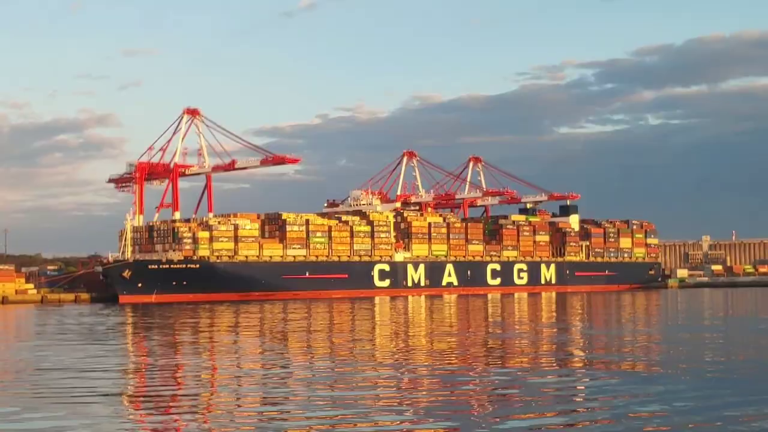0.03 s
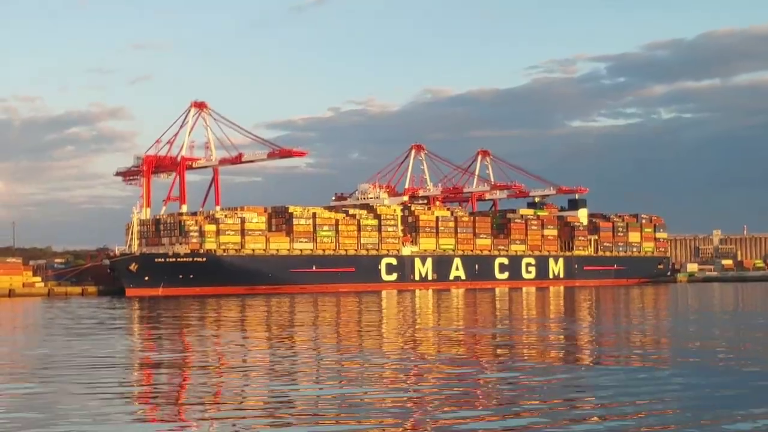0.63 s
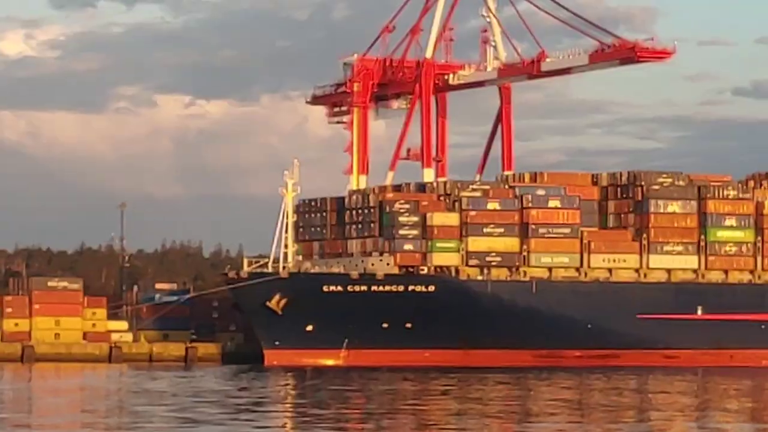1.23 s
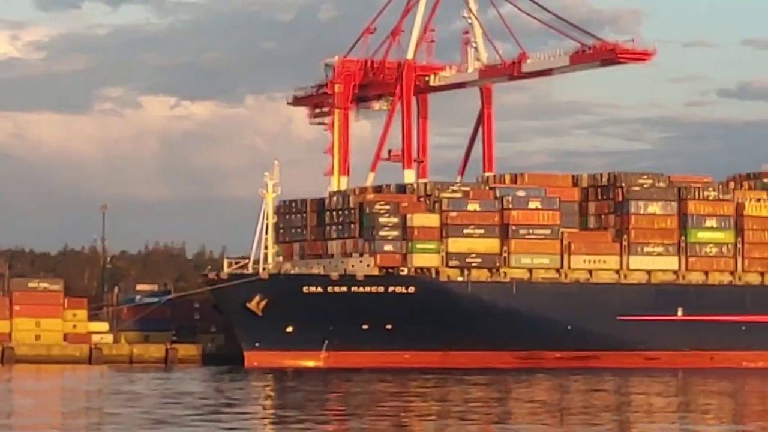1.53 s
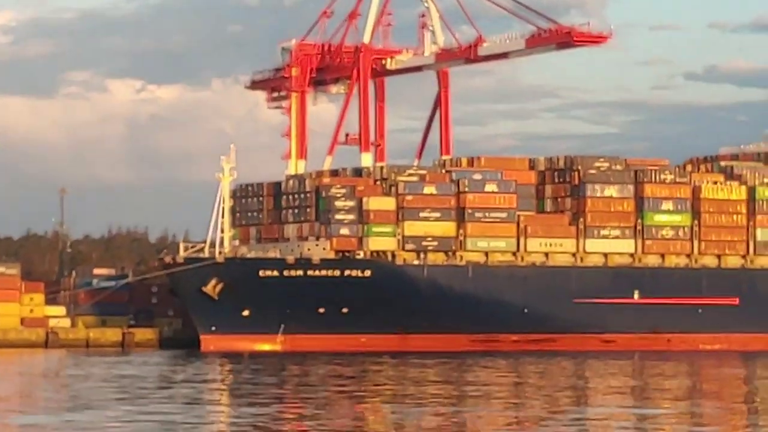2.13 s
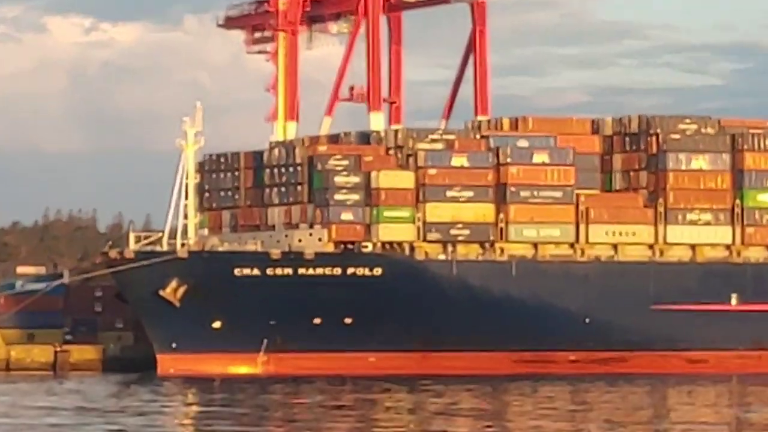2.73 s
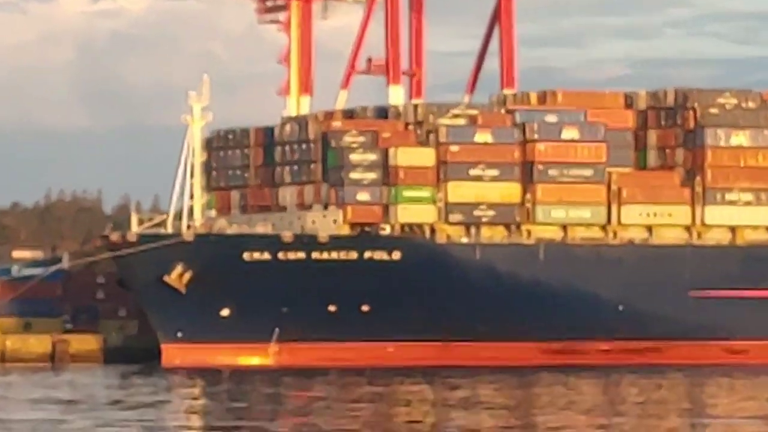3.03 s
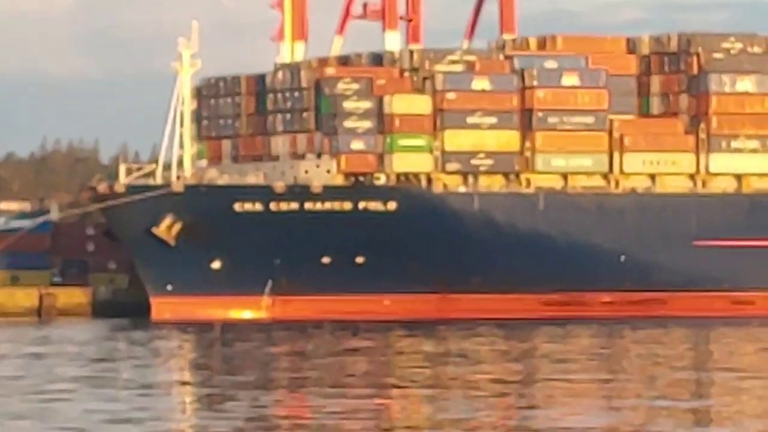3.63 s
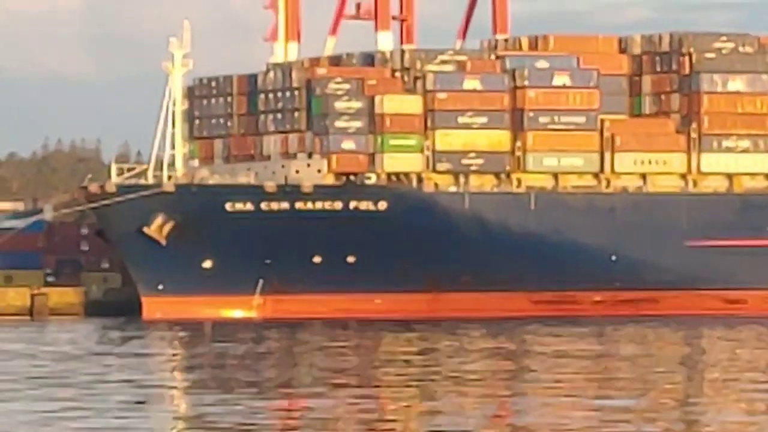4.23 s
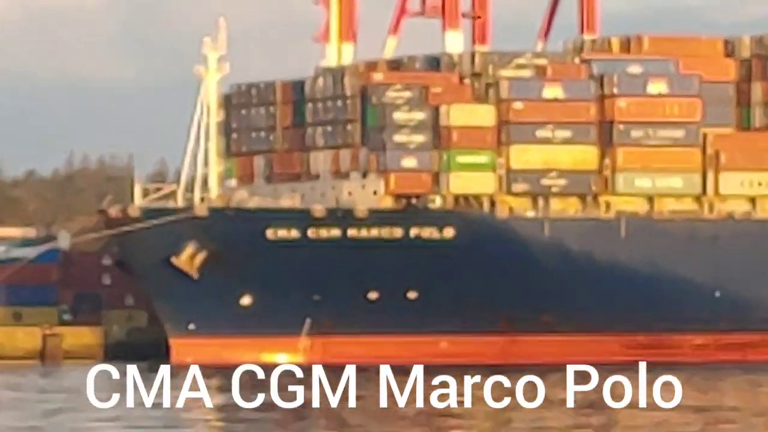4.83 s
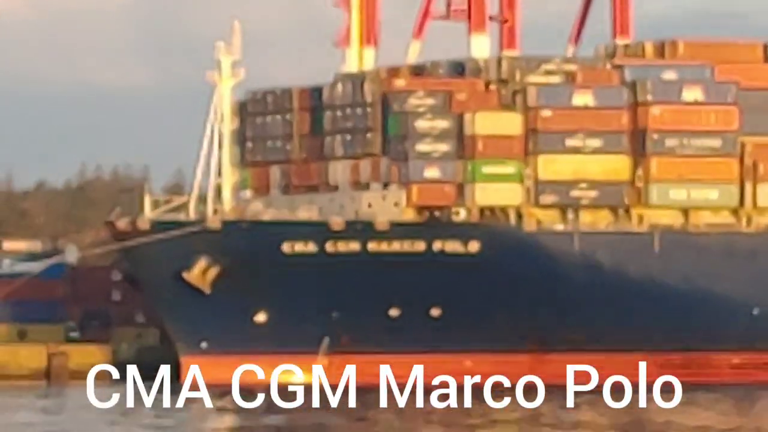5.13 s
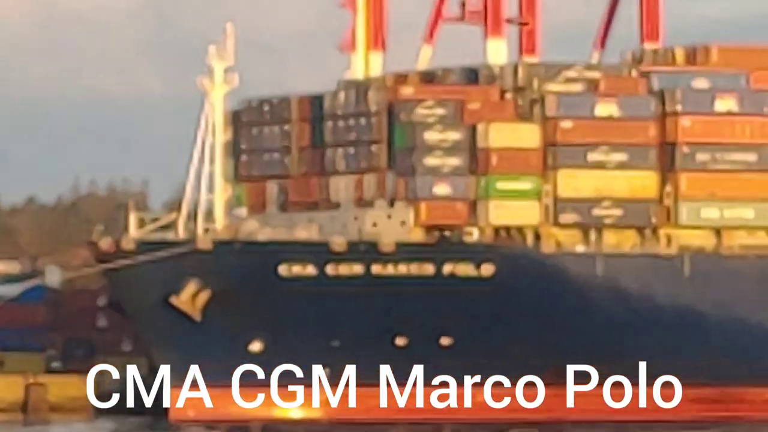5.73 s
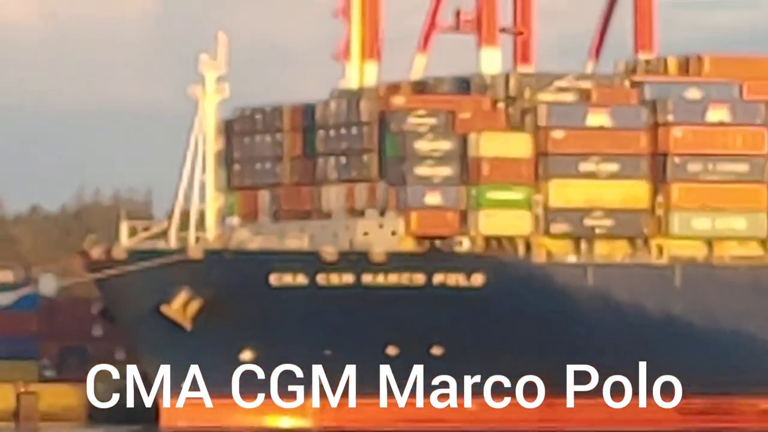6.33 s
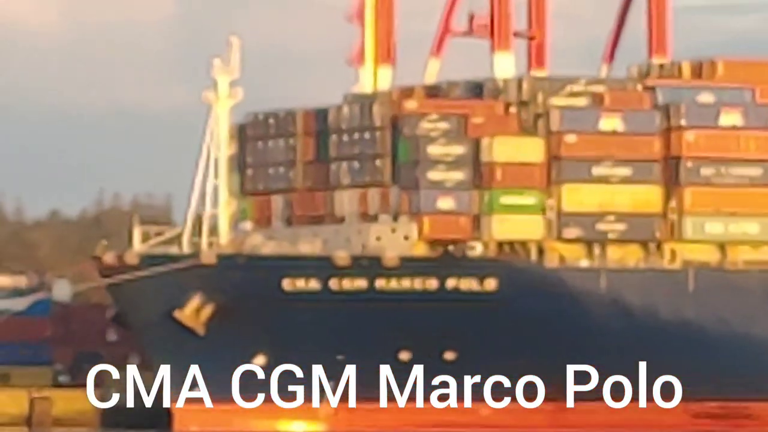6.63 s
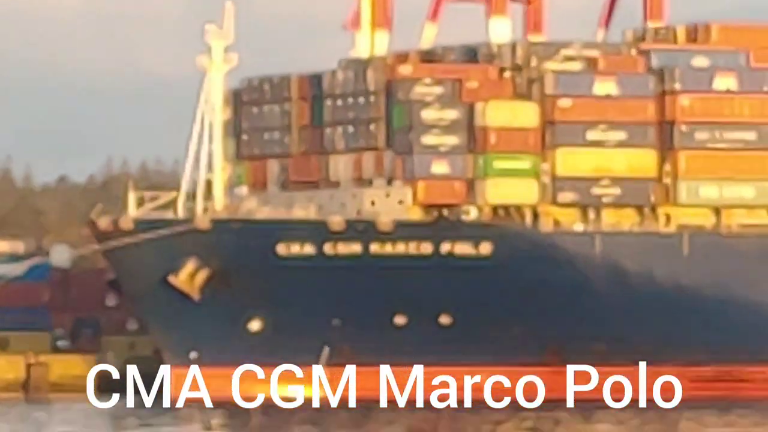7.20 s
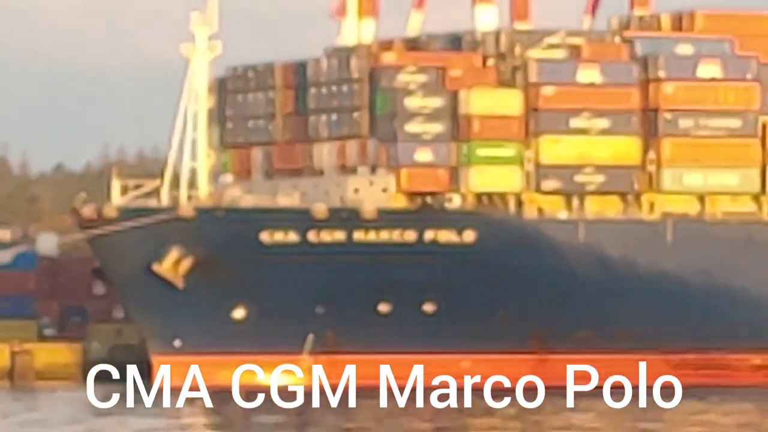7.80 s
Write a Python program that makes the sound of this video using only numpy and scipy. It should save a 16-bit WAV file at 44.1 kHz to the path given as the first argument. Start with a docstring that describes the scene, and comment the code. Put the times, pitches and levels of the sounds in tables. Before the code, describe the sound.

Outdoors at a harbour, a distant microphone picks up the low, slowly pulsing hum of a large ship's diesel generators. Wavering fan tones and a high hiss sit over a diffuse rumble. Everything drops to silence for an instant near the start, and returns with the bass briefly stronger. Later the hiss swells slightly a few times while the fan tones drift between left and right and the drone continues.

```python
"""A low, slowly beating drone carries over calm harbour water from a container ship at its berth.
Two diesel generators, almost in step, interfere about once a second above weaker engine and exhaust tones.
Ventilation fans sing at their blade frequencies, scattered by moving air, over the diffuse roar of
the port, and a bright hiss lies on top. The sound cuts out once, just after a second, and fades back in."""
import sys
import numpy as np
from scipy import signal
from scipy.io import wavfile
from scipy.ndimage import uniform_filter1d

SR = 44100
rng = np.random.default_rng(int(sys.argv[2]) if len(sys.argv) > 2 else 0)


def wav_record(signal):
    """Record a signal, one row per channel, as 16-bit PCM in the file named by sys.argv[1]."""
    frames = np.transpose(np.atleast_2d(signal))
    bounded = np.clip(frames, -1, 1)
    # unit amplitude maps onto the largest positive 16-bit level
    quanta = np.round(bounded * 32767).astype(np.int16)
    wavfile.write(sys.argv[1], SR, quanta)


N = 351036
TIME = np.arange(N) / SR
STOP_S, RESTART_S = 1.128, 1.2372  # the silent span

# Coherence of left and right, set by the microphone spacing: frequency_hz, correlation
COHERENCE = [(20, 0.98), (50, 0.79), (130, 0.89), (290, 0.93), (420, .72), (560, 0.5), (780, 0.23),
             (1100, -0.37), (1400, -0.28), (1900, 0.25), (2900, -0.16), (4000, -0.029)]


def amp(db):
    """Amplitude ratio of a level: a factor of ten for every 20 dB."""
    return 10 ** (np.asarray(db) / 20)


def unit_rms(x):
    """Normalisation to a mean power of one."""
    return x / np.sqrt(np.mean(x ** 2) + 1e-20)


def spectrum(points, hz):
    """Interpolation of a table along a logarithmic frequency axis."""
    frequency_hz, value = np.transpose(points)
    return np.interp(np.log(hz + 1), np.log(frequency_hz), value)


def ramp(start_s, length_s):
    """Linear envelope rising from zero to one."""
    return np.clip((TIME - start_s) / length_s, 0, 1)


def bell(middle_s, half_s):
    """Gaussian envelope of height one."""
    return np.exp(-((TIME - middle_s) / half_s) ** 2)


def drift(top_hz):
    """Random modulation of unit rms: a superposition of slow sines up to the given rate."""
    coarse_s = np.linspace(0, N / SR, 800)
    rates_hz = top_hz * np.geomspace(.1, 1, 20)[:, None]
    sines = np.sin(2 * np.pi * (rates_hz * coarse_s + rng.random(rates_hz.shape))) / np.sqrt(rates_hz)
    return np.interp(TIME, coarse_s, unit_rms(sines.sum(0)))


def tone(hz, phase):
    """Simple harmonic oscillation of unit rms."""
    return np.sqrt(2) * np.sin(2 * np.pi * hz * TIME + phase)


def diffuse_field(density, patchy_db, frame, lean=None):
    """Noise from all around, partly coherent at two microphones and stirred into patches by moving air."""
    hz = np.fft.rfftfreq(frame, 1 / SR)
    draws = rng.standard_normal((5, 4 * N // frame + 5, len(hz)))
    left, independent = draws[0] + 1j * draws[1], draws[2] + 1j * draws[3]
    coherence = spectrum(COHERENCE, hz)
    field = np.array([left, coherence * left + np.sqrt(1 - coherence ** 2) * independent])
    patches = uniform_filter1d(draws[4], size=8, axis=0)  # smooth in time
    patches = unit_rms(uniform_filter1d(patches, size=10, axis=1))  # and in frequency
    field *= amp(spectrum(density, hz) + patchy_db * patches)
    if lean is not None:
        field *= amp(np.array([1, -1])[:, None, None] * spectrum(lean, hz) / 2)
    field *= np.sqrt(3 * SR / (2 * frame))  # spectral density to bin amplitude
    _, noise = signal.istft(field, nperseg=frame, noverlap=frame - frame // 4, time_axis=1, freq_axis=2)
    return noise[:, :N]


def noise_swell():
    """Common envelope of the noise layers: each swell has a Gaussian rise and an exponential decay."""
    # Swells of the noise: peak_s, strength, attack_s, release_s
    swells = [(3.0, 0.3, .7, .75), (5.1, 0.9, .25, .5), (6.56, .95, .14, .6)]
    envelope = np.zeros(N)
    for peak_s, strength, attack_s, release_s in swells:
        age_s = TIME - peak_s
        envelope += strength * np.exp(-np.where(age_s < 0, (age_s / attack_s) ** 2, age_s / release_s))
    return envelope


def port_roar(swell, top_s=4.8, sag_db_per_s2=0.12):
    """The port as a diffuse field of low noise, whose level rises and sinks in one slow arch."""
    # Base spectrum of the roar: frequency_hz, density_db_per_hz
    density = [(20, -66), (32, -54), (75, -46), (130, -48.5), (165, -50), (215, -47), (300, -51),
               (410, -50), (480, -57.5), (760, -57), (950, -61.5), (1150, -60.5), (1850, -65.5),
               (2600, -75), (6000, -89)]
    level_db = 0.85 - sag_db_per_s2 * (TIME - top_s) ** 2 + 0.9 * swell
    return diffuse_field(density, patchy_db=1.04, frame=2048) * amp(level_db)


def hiss(swell, swell_db=(2.5, 0.5), early_db=0.4):
    """Broadband noise peaking near 7 kHz; a level difference between channels leans it to one side."""
    # Base spectrum of the hiss: frequency_hz, density_db_per_hz
    density = [(1000, -87), (2500, -71.5), (3300, -69), (4250, -66), (5200, -68.5), (6050, -67),
               (6700, -60.5), (7250, -56.5), (8100, -61.5), (8900, -70), (10500, -77), (12500, -85),
               (15500, -99)]
    # Balance of the hiss: frequency_hz, left_minus_right_db
    lean = [(2600, 2.5), (3400, 0), (4200, -3.5), (5500, -0.5), (6200, -1), (7300, -5), (8800, -1.5),
            (11500, -2.5), (14000, -2)]
    level_db = 0.13 + early_db * (TIME < RESTART_S) + np.outer(swell_db, swell)
    return diffuse_field(density, patchy_db=0.89, frame=512, lean=lean) * amp(level_db)


def sizzle(swell, swell_db=9.5, early_db=-4):
    """Finely modulated treble noise that grows after the silence and brightens each swell."""
    # Base spectrum of the sizzle: frequency_hz, density_db_per_hz
    density = [(2000, -91), (5000, -76), (9000, -72), (12000, -79), (15500, -82)]
    level_db = -10 + swell_db * swell + early_db * (1 - ramp(RESTART_S, length_s=1.0))
    return diffuse_field(density, patchy_db=3.0, frame=256) * amp(level_db)


def background(flicker_db=0.13):
    """Independent noises add in power; all three swell together, and the treble flickers slightly."""
    swell = noise_swell()
    return port_roar(swell) + (hiss(swell) + sizzle(swell)) * amp(flicker_db * drift(25))


def fan_fading(depth=1.3):
    """Fading: two big fans carry unevenly over the water. Gives dB for each fan and microphone."""
    # Resting gain of the lower and the upper fan, before scaling by depth: left_db, right_db
    resting = [(0.12, -0.45), (-1.4, -.5)]
    # Swells and lulls, before scaling by depth: middle_s, half_length_s, fan, left_db, right_db
    swells = [(.55, .22, "lower", -3, 6), (0.902, 0.18, "upper", 1, 3), (1.947, 0.54, "upper", 5, 4.5),
              (2.08, 0.17, "lower", 3, 3.5), (4.1, .5, "upper", -1.5, -6), (5.4, .42, "lower", -3, -4.5),
              (5.5, 0.31, "upper", 6.5, 3), (6.18, 0.17, "upper", 2, 7), (6.3, .2, "lower", 1.5, 3),
              (6.8, .25, "lower", 4, 7.5), (6.85, .2, "upper", -3, 0), (7.607, .38, "upper", 2, 8),
              (7.82, 0.41, "lower", 3.5, 9)]
    level_db = np.array(resting)[:, :, None] * np.ones(N)
    for middle_s, half_s, fan, left_db, right_db in swells:
        level_db[("lower", "upper").index(fan)] += np.outer([left_db, right_db], bell(middle_s, half_s))
    return depth * level_db


def fans(big_fans_hz=(359, 438), reach_hz=20, waver_rad=0.32, flutter_db=1.2, early_db=-4):
    """Blade tones: scattering in the air modulates their level and their phase at each microphone."""
    # Blade tones at their base levels, close pairs beating: pitch_hz, left_db, right_db
    blade_tones = [(332.6, -40.5, -39), (352.1, -34.5, -31), (358.7, -25.5, -29.5), (362.7, -34.5, -34),
                   (376.6, -42.5, -40.5), (435.2, -34, -32.5), (440, -37.5, -41), (547, -45, -38.5),
                   (618, -46, -53), (662, -63, -55), (720.5, -43.5, -45), (767.5, -46, -39),
                   (778.9, -38.5, -42.5), (872, -49, -43), (882.5, -46.5, -45.5), (1035, -52.5, -54),
                   (1060, -49, -47.5), (1070, -55, -48)]
    fading_db, sound = fan_fading(), np.zeros((2, N))
    for hz, left_db, right_db in blade_tones:
        shares = np.exp(-((hz - np.array(big_fans_hz)) / reach_hz) ** 2)  # nearby tones follow a big fan
        level_db = np.array([[left_db], [right_db]]) + np.tensordot(shares, fading_db, 1)
        level_db += early_db * (hz > 500) * (TIME < STOP_S)  # the high whine starts fainter
        phase = rng.uniform(0, 2 * np.pi) + waver_rad * drift(3)
        apart_rad = np.arccos(spectrum(COHERENCE, hz)) * (0.16 + 0.77 * drift(1.185))
        pair = np.array([tone(hz, phase), tone(hz, phase + apart_rad)])
        sound += amp(level_db + flutter_db * drift(3)) * pair
    return sound


def bass_envelope(surge_s=1.273, attack_s=0.094, hold_s=0.54, release_s=0.081):
    """Amplitude modulation of the bass in dB: it returns late after the silence, surges, and later dips."""
    late = (TIME > RESTART_S) * (1 - ramp(RESTART_S, length_s=0.13))
    surge = ramp(surge_s, attack_s) - ramp(surge_s + attack_s + hold_s, release_s)
    dip = bell(middle_s=6.88, half_s=0.09)
    return -0.3 - 13 * late + 6 * surge - 4 * dip


def engine_partials(bass_db, waver_rad=0.28, stereo_rad=0.085, flutter_db=1.27):
    """The line spectrum of engines and exhausts; interference between neighbours makes the drone throb."""
    # Partials at their base levels: pitch_hz, level_db
    partials = [(42.6, -37.5), (47.9, -35), (67.5, -26.5), (75, -28), (77.3, -42.5), (86.6, -40.5),
                (89.7, -27), (103.9, -37), (115.9, -37.5), (119.6, -40.5), (137.2, -34.5), (181.7, -40.5),
                (204.2, -35.5), (231.8, -30.5), (289.4, -41.5)]
    sound = np.zeros((2, N))
    for hz, level_db in partials:
        follow_db = 0.75 * bass_db * (hz < 100)  # only deep partials follow the bass envelope
        phase = rng.uniform(0, 2 * np.pi) + waver_rad * drift(2.02)
        phase = phase + stereo_rad * np.array([drift(1.49), drift(1.9)])
        sound += amp(level_db + follow_db + flutter_db * drift(3)) * tone(hz, phase)
    return sound


def generators(pitch_hz=59.6, beat_hz=1.055, in_step_s=2.63, waver_rad=0.072, stereo_rad=0.085):
    """Beats: two diesel generators reinforce and partly cancel at their difference frequency."""
    phase = rng.uniform(0, 2 * np.pi) + waver_rad * drift(2.4)
    phase = phase + stereo_rad * np.array([drift(2.1), drift(2.6)])
    lead_rad = 2 * np.pi * beat_hz * (TIME - in_step_s)
    return amp(-15) * tone(pitch_hz, phase) + amp(-30) * tone(pitch_hz, phase + lead_rad)


def ship_drone(right_db=0.6):
    """Generators and weaker partials sum to one drone, slightly louder on the right."""
    bass_db = bass_envelope()
    drone = generators() * amp(bass_db) + engine_partials(bass_db)
    return drone * amp([[0], [right_db]])


def scene():
    """Superposition of the ship's drone, its fans and the port."""
    return ship_drone() + fans() + background()


def record(dry, cut_s=0.003, fade_s=0.23, threshold_db=-11.5, slope=0.36, average_s=0.2, edge_hz=15850):
    """A gate cuts the sound and fades it back in; compression, clipping and a low-pass filter follow."""
    cut = 1 - ramp(STOP_S - cut_s / 2, cut_s)
    fade_db = -1 - 15 * (1 - ramp(RESTART_S, fade_s)) ** 1.44
    gated = dry * (cut + (TIME > RESTART_S) * amp(fade_db))
    power = uniform_filter1d((gated ** 2).mean(0), size=round(average_s * SR))
    excess_db = np.maximum(10 * np.log10(abs(power) + 1e-12) - threshold_db, 0)
    compressed = np.clip(gated * amp(-slope * excess_db), -1, 1)
    low_pass = signal.firwin(511, edge_hz, window=("kaiser", 9), fs=SR)
    return signal.oaconvolve(compressed, low_pass[None], "same")


dry = scene()
out = record(dry)
wav_record(out)
```